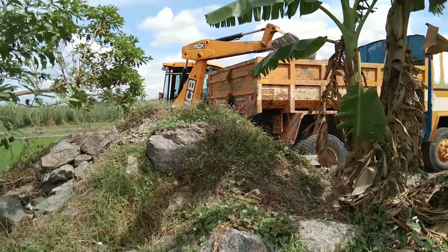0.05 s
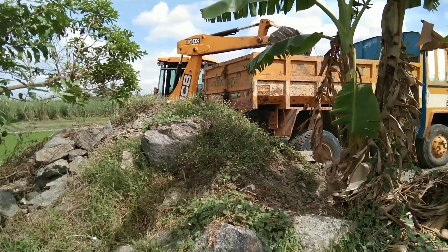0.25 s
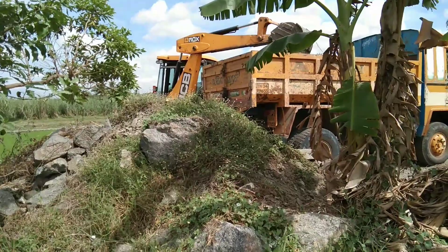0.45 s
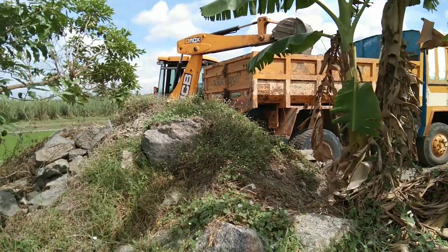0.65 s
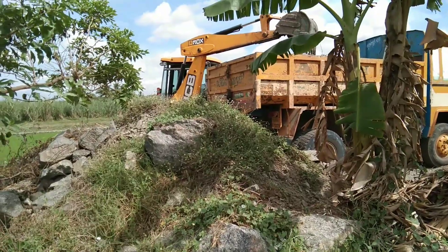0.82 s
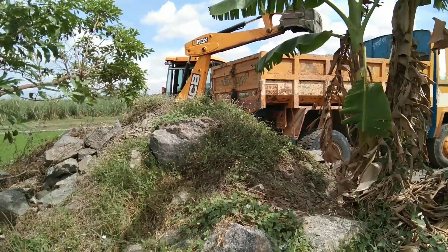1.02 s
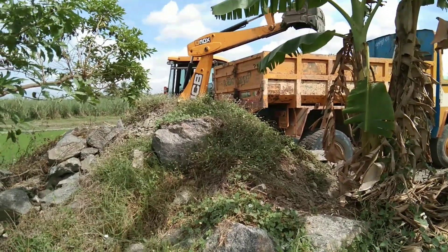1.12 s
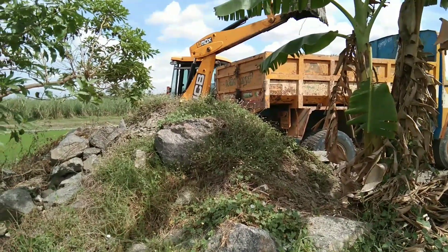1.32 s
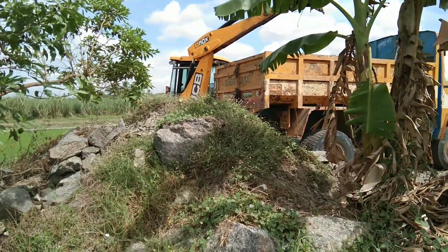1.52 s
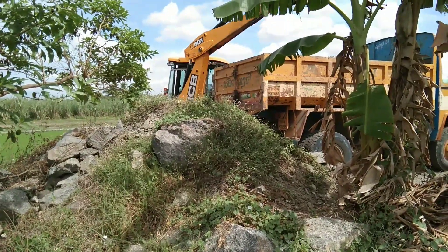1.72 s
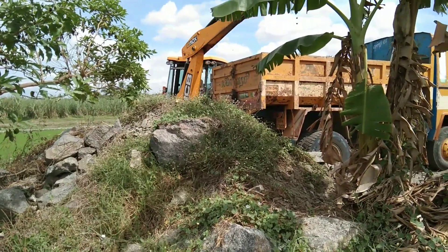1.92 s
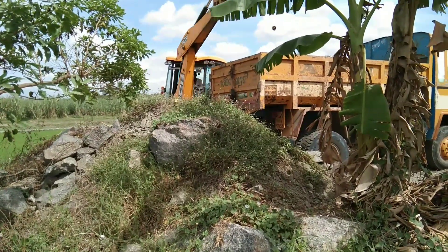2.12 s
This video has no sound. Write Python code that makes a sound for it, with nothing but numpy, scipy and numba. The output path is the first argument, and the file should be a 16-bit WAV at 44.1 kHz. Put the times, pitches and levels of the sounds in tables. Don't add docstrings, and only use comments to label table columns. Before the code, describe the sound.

Loud clanking and hollow booming of a loader bucket against a metal truck bed, first a hard cluster, then another about a second later, fading into scrapes and rattles; engine rumble and thin high insects behind, open air, mid-distance microphone.

```python
import sys
import numpy as np
from scipy import signal
from scipy.fft import rfft, irfft
from scipy.io import wavfile
from scipy.ndimage import uniform_filter1d
from numba import njit

SR = 44100
rng = np.random.default_rng(int(sys.argv[2]) if len(sys.argv) > 2 else 0)


def generate_wav(signal):
    frames = np.transpose(np.atleast_2d(signal))
    scaled = np.clip(frames, -1, 1) * 32767
    pcm = np.round(scaled).astype(np.int16)
    wavfile.write(sys.argv[1], SR, pcm)


def how_loud(loudness_db):
    steps = np.asarray(loudness_db, float) / 20
    return 10 ** steps


N = 94815


def level(x, db):
    return x * how_loud(db) / np.sqrt(np.mean(x ** 2))


def shape(table, hz):
    known_hz, known_db = np.array(table).T
    return np.interp(np.log(hz), np.log(known_hz), known_db)


def near(hz, centre_hz, spread_oct):
    return (np.log2(hz / centre_hz) / spread_oct) ** 2


def band(x, hz, width_hz, order=1):
    edges = [max(hz - width_hz / 2, 10), min(hz + width_hz / 2, 0.45 * SR)]
    return signal.sosfilt(signal.butter(order, edges, "band", fs=SR, output="sos"), x)


def walk(rate):
    hold = int(SR / rate)
    steps = np.repeat(rng.standard_normal(N // hold + 1), hold)
    return 1.4 * uniform_filter1d(uniform_filter1d(steps, hold), hold)[:N]


@njit
def ring(poles, gains, size):
    out = np.zeros(size)
    for k in range(len(poles)):
        z = gains[k] + 0j
        for i in range(size):
            z *= poles[k]
            out[i] += z.imag
    return out


def body(low_hz, high_hz, rule, times, strengths_db, rattles_s, colour_db, count):
    low_s, high_s, rise_s, blow_db, scatter_db, per_s = rule
    place = (np.arange(count) + rng.random(count)) / count
    hz = low_hz + (high_hz - low_hz) * place ** 1.2
    t60 = (low_s + (high_s - low_s) * place) * np.exp(0.25 * rng.standard_normal(count))
    poles = np.exp(2j * np.pi * hz / SR - np.log(1000) / (t60 * SR))
    t = np.arange(20000) / SR
    contact_scatter_db, linger_db, linger_t60_s = 4, -17, 0.77
    linger = how_loud(linger_db - 60 * t / linger_t60_s)
    out = np.zeros(N + 32768)
    for k, (start, db) in enumerate(zip(times, strengths_db)):
        mode_db = colour_db(k, hz) + scatter_db * rng.standard_normal(count)
        gains = how_loud(mode_db) * rng.choice([-1, 1], count)
        contacts = (rng.random(len(t)) < per_s / SR) * rng.choice([-1, 1], len(t))
        contacts = contacts * how_loud(contact_scatter_db * rng.standard_normal(len(t)))
        rattle = how_loud(-60 * t / max(rattles_s[k], 0.02))
        contacts *= (1 - np.exp(-t / rise_s)) * (rattle + linger)
        contacts[0] = how_loud(blow_db)
        knock = signal.fftconvolve(ring(poles, gains, size=6000), contacts)
        onset_rms = np.sqrt(np.mean(knock[:1100] ** 2))
        at = int(start * SR)
        out[at:at + len(knock)] += knock / onset_rms * how_loud(db)
    return out[:N]


def yard():
    # frequency in Hz, density in dB per Hz.
    spectrum = [(15, -47), (25, -3), (188, 14), (495, 1), (804, -6), (1020, -5), (4500, -20.5), (6380, -82),
                (15500, -109)]
    # time in s, level in dB.
    load = [
        (0, -0.5),
        (.5, 0.5),
        (0.849, 0.5),
        (1.0, -3.5),
        (1.12, -3.5),
        (1.4, 2.5),
        (1.85, 1.5),
        (2.15, -4.5),
    ]
    swell_db, flicker_db = 1, 1.5
    out, swell = 0, walk(4.44)
    for hz in 28 * 2 ** (np.arange(28) / 3):
        db = shape(spectrum, hz) + 10 * np.log10(hz)
        db = db + swell_db * swell + flicker_db * walk(15.28)
        out = out + how_loud(db) * level(band(rng.standard_normal(N), hz, hz / 4, order=2), 0)
    load_s, load_db = np.array(load).T
    return level(out, -34) * how_loud(np.interp(np.arange(N) / SR, load_s, load_db))


def engine():
    # frequency in Hz, width in Hz, level in dB.
    exhaust = [(196, 83, -19), (798, 180, -15)]
    firing_hz, firing_scatter_db = 37, 2.5
    chance = rng.standard_normal((200, 2))
    at = (np.cumsum(1 + 0.0393 * chance[:, 0]) * SR / firing_hz).astype(int)
    pulses = np.zeros(N)
    pulses[at[at < N]] = how_loud(firing_scatter_db * chance[at < N, 1])
    out = np.zeros(N)
    for k, (hz, width_hz, db) in enumerate(exhaust):
        sign = (-1) ** k
        out += sign * how_loud(db) * level(band(pulses, hz, width_hz, order=2), 0)
    return level(out, -54)


def insects():
    # start in s, level in dB, frequency in Hz.
    chirps = [(0.0305, -46, 6300), (0.0598, -45.5, 6400), (0.0925, -43, 6370), (.147, -57, 6450),
              (.178, -52, 6400), (0.546, -53, 6300), (1.008, -58, 6250), (1.038, -56, 6170),
              (1.073, -49.5, 6120), (1.42, -46, 6550), (1.455, -44.5, 6400), (1.885, -51.5, 5940),
              (1.915, -53.5, 6100), (2.044, -52, 6400), (2.073, -43, 6440), (2.104, -43, 6430),
              (2.137, -42.5, 6400)]
    pulse_s, gap_s, sag_hz, fade_db = 0.0041, 0.0051, 120, 3.5
    t, out = np.arange(N) / SR, np.zeros(N)
    for start, db, hz in chirps:
        for k in range(4):
            u = (t - start - k * gap_s) / pulse_s
            env = np.where((u > -1) & (u < 0.5), (np.clip(u, -1, 1) + 1) / 1.08, 0) ** 0.68
            env = uniform_filter1d(env, size=40)
            tone = np.sin(2 * np.pi * (hz + 120 - k * sag_hz) * t)
            out += how_loud(db + 7.5 - k * fade_db) * env * tone
    clicks_per_s = 1300
    clicks = (rng.random(N) < clicks_per_s / SR) * rng.standard_normal(N)
    clicks = clicks + 0.3 * rng.standard_normal(N)
    chorus = level(band(clicks, hz=6400, width_hz=1590, order=2), -53.5)
    return out + how_loud(2 * walk(10.9)) * chorus


def hiss_bursts():
    # time in s, level in dB, decay t60 in s.
    ticks = [(0.2044, -45, 0.1), (0.2108, -49, 0.15), (0.2293, -41, 0.1), (0.3849, -48, 0.16),
             (0.4438, -42, 0.14), (0.5835, -48, 0.11), (0.7376, -50.5, 0.23), (0.7694, -48, 0.16),
             (0.8509, -56.5, 0.16), (1.0589, -66, 0.1), (1.1224, -43.5, 0.1), (1.1297, -46, 0.1),
             (1.1986, -45, 0.12), (1.3128, -54, 0.14), (1.345, -38, 0.12), (1.3644, -42, 0.12),
             (1.4395, -46, 0.16), (1.5483, -44, 0.15), (1.5937, -47, 0.14), (1.6544, -59, 0.13),
             (1.7289, -50.5, 0.077), (1.7753, -53, 0.099), (1.8144, -52, 0.11), (1.8641, -52, 0.12)]
    rise_s = 0.0045
    t, env = np.arange(N) / SR, np.zeros(N)
    for start, db, t60 in ticks:
        age = np.maximum(t - start + rise_s, 0)
        env += how_loud(db - 60 * age / max(t60, 0.01)) * (1 - np.exp(-age / rise_s))
    hiss = level(band(rng.standard_normal(N), hz=13400, width_hz=5100, order=2), 0)
    return env * how_loud(-14.5 + 1.5 * walk(100)) * hiss


def bed():
    # start in s, level in dB, centre in Hz of the part of the bed that moves.
    booms = [(.002, -33.5, 199), (0.102, -30, 204), (0.202, -16, 272), (0.228, -18, 203), (.23, -19.5, 320),
             (0.245, -24, 126), (.265, -26, 170), (.325, -17, 196), (0.348, -43, 98), (0.419, -24, 206),
             (0.462, -39, 125), (0.51, -32, 194), (0.599, -58, 207), (.724, -23.5, 288),
             (0.741, -20.5, 129), (0.745, -25.5, 73.8), (0.799, -31, 175), (0.852, -43, 84),
             (1.124, -17.5, 235.4), (1.139, -17.5, 315.5), (1.159, -17.5, 167.3), (1.199, -32, 220),
             (1.21, -21.5, 380), (1.26, -20, 162), (1.271, -31, 410), (1.368, -25, 138),
             (1.375, -28.5, 347), (1.385, -28, 195), (1.452, -32.5, 158), (1.544, -28, 203),
             (1.632, -26, 206), (1.69, -29.5, 157), (1.56, -29.5, 310), (1.68, -32, 316),
             (1.789, -24.5, 182), (1.801, -31, 323), (1.821, -27, 120), (1.831, -26.5, 187),
             (1.87, -31, 181), (1.91, -32, 168), (1.95, -39.5, 187), (1.989, -31.5, 187)]
    # ring t60 at the low end in s, at the high end in s, rattle rise in s, first blow in dB,
    # scatter per knock in dB, contacts per s.
    bed_ring = (0.086, 0.14, 0.001, 7.35, 2.24, 500)
    start, db, centre_hz = np.array(booms).T
    rattle_s = 0.29 * (153 / centre_hz) ** 0.57

    def colour_db(k, hz):
        return -10 * near(hz, centre_hz[k], spread_oct=0.34)

    out = body(58, 438.5, bed_ring, start, db - 0.36, rattle_s, colour_db, count=36)
    return signal.sosfilt(signal.butter(2, 55, "high", fs=SR, output="sos"), out)


def panels():
    # frequency in Hz, strength in dB.
    modes = [(430, 1), (500, -3.5), (660, -1.5), (780, -4.6), (900, -1), (1080, -35)]
    # start in s, level in dB, centre in Hz of the panel that moves.
    slaps = [(0.002, -28.5, 725), (0.102, -30, 850), (0.205, -13, 765), (0.218, -7, 760),
             (0.243, -11.5, 681), (0.267, -16, 660), (0.318, -22, 657), (0.385, -22.5, 730),
             (0.454, -18.5, 832), (0.584, -26, 790), (0.727, -24.5, 700), (0.757, -20.5, 736),
             (0.835, -27.5, 793), (0.898, -30, 760), (1.129, -16.5, 816), (1.154, -11.5, 725),
             (1.201, -11.5, 705), (1.236, -16.5, 910), (1.301, -27, 633), (1.345, -29.5, 850),
             (1.364, -22, 679), (1.39, -22.5, 778), (1.476, -28, 780), (1.517, -30, 666), (1.552, -22, 590),
             (1.572, -21, 680), (1.63, -17.5, 730), (1.659, -26.5, 890), (1.738, -24, 870), (1.8, -23, 720),
             (1.84, -27.5, 750), (1.875, -44, 860), (1.987, -38, 816)]
    # ring t60 at the low end in s, at the high end in s, rattle rise in s, first blow in dB,
    # scatter per knock in dB, contacts per s.
    panel_ring = (0.039, 0.045, 0.0031, 12.4, 1.97, 900)
    start, db, centre_hz = np.array(slaps).T
    rattle_s = np.full(len(slaps), 0.32)

    def colour_db(k, hz):
        return shape(modes, hz) - 10 * np.minimum(near(hz, centre_hz[k], spread_oct=0.33), 1.5)

    return body(modes[0][0], modes[-1][0], panel_ring, start, db - 8.5, rattle_s, colour_db, count=40)


def bucket():
    # frequency in Hz, strength in dB.
    modes = [(950, -2), (1700, -5), (2250, -1.5), (2780, -5.5), (3120, 0), (4500, -12.5), (7350, -12),
             (10500, -37.5)]
    # start in s, clank level in dB, frequency that rings most in Hz,
    # brightness in dB per octave, rattle t60 in s.
    knocks = [(0.0024, -32.5, 1530, -4.5, 0.22), (0.1073, -39, 3260, 2, 0.25),
              (0.2034, -18, 3340, -4.5, 0.49), (0.2081, -8, 3100, -0.3, 0.16), (0.2304, -9, 2960, 4, 0.16),
              (0.3244, -30, 3030, -15, 0.34), (0.4436, -15.5, 2660, 3.2, 0.12),
              (0.583, -26, 3550, 5.8, 0.11), (0.61, -36.5, 1820, 7, 0.75), (0.7248, -26, 2470, 8.7, 0.29),
              (0.7415, -27, 2160, 5.5, 0.32), (0.8497, -35, 2120, 7, 0.4), (1.0527, -37.5, 3700, 5, 0.32),
              (1.1243, -4, 2110, 2.3, 0.12), (1.1491, -12, 3110, 1.5, 0.083), (1.1841, -11, 2320, -3, 0.21),
              (1.2022, -11.5, 2520, 1.1, 0.092), (1.24, -20, 1610, -14, 0.13),
              (1.3152, -33, 3720, 5.5, 0.21), (1.3486, -16, 3150, 4.5, 0.12), (1.3642, -23, 2230, 3, 0.42),
              (1.444, -29.5, 2920, -0.5, 0.33), (1.5391, -25, 3000, -0.5, 0.14),
              (1.5505, -26, 2400, 6, 0.17), (1.5991, -26, 3010, 1.5, 0.38),
              (1.6344, -27.5, 2350, -2.5, 0.18), (1.731, -29.5, 2100, 9, 0.31),
              (1.7837, -29, 2920, 3.5, 0.27), (1.8185, -33, 3100, 5, 0.22), (1.8697, -52, 1680, -1, 0.19)]
    # ring t60 at the low end in s, at the high end in s, rattle rise in s, first blow in dB,
    # scatter per knock in dB, contacts per s.
    bucket_ring = (0.071, 0.0069, 0.00047, 8.5, 0.57, 2800)
    start, db, clank_hz, tilt_db, rattle_s = np.array(knocks).T

    def colour_db(k, hz):
        clank_db = 7.5 * np.exp(-near(hz, clank_hz[k], spread_oct=0.067))
        return shape(modes, hz) + tilt_db[k] * np.log2(hz / 3000) + clank_db

    return body(modes[0][0], modes[-1][0], bucket_ring, start, db - 9.5, rattle_s, colour_db, count=300)


def scene():
    # frequency in Hz, level in dB.
    microphone = [(20, -12), (45, -2.5), (90, -0.5), (7600, 0), (9000, -2), (11000, -4), (16000, -4)]
    # frequency in Hz, width in octaves, depth in dB.
    bounce = [(474, 0.11, -5.5), (1067, 0.078, -5), (4590, 0.13, -2.5)]
    heard = yard() + engine() + insects() + bed() + panels() + bucket()
    hz = np.arange(1, N // 2 + 2) * SR / N
    dips_db = sum(db * np.exp(-near(hz, at_hz, wide_oct)) for at_hz, wide_oct, db in bounce)
    heard = irfft(rfft(heard) * how_loud(shape(microphone, hz) + dips_db), N)
    hiss = how_loud(-81) * rng.standard_normal(N)
    return (heard + hiss + hiss_bursts())[None]


def top_cut(x):
    return signal.sosfilt(signal.butter(12, 15810, fs=SR, output="sos"), x)


def record(dry):
    rounded = np.tanh(dry) / 1.116
    low_pass = signal.ellip(8, 0.2, 60, 15750, fs=SR, output="sos")
    return top_cut(signal.sosfilt(low_pass, rounded))


dry = scene()
out = record(dry)
generate_wav(out)
```